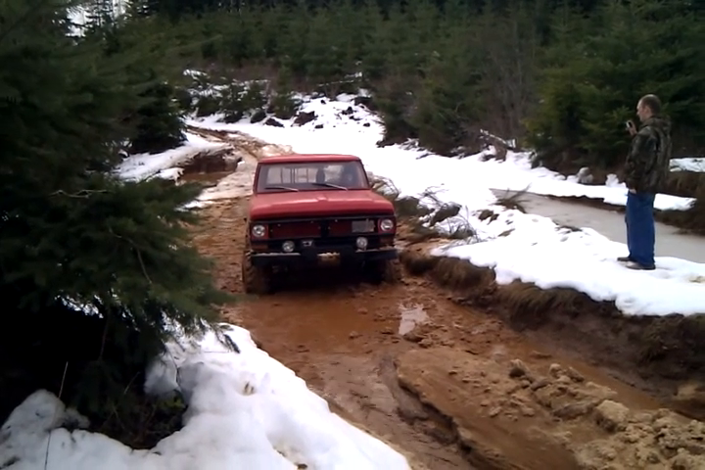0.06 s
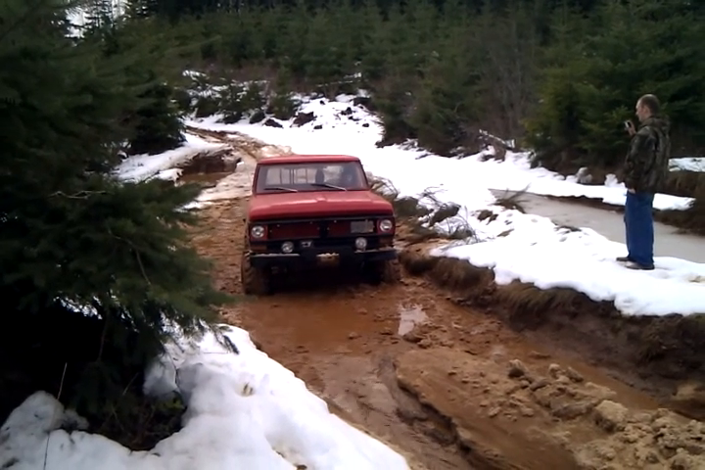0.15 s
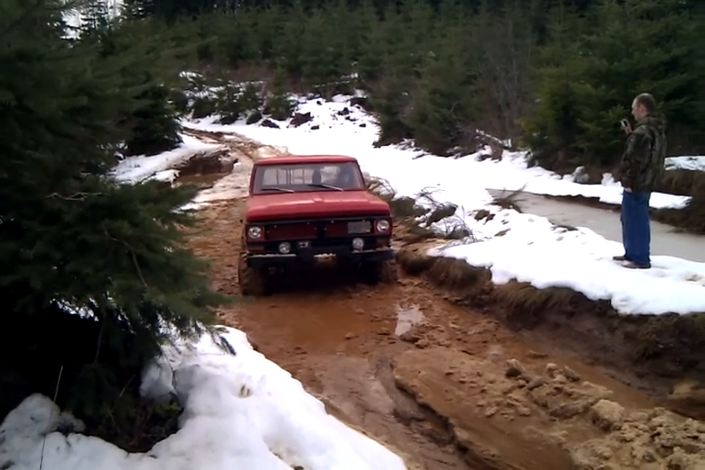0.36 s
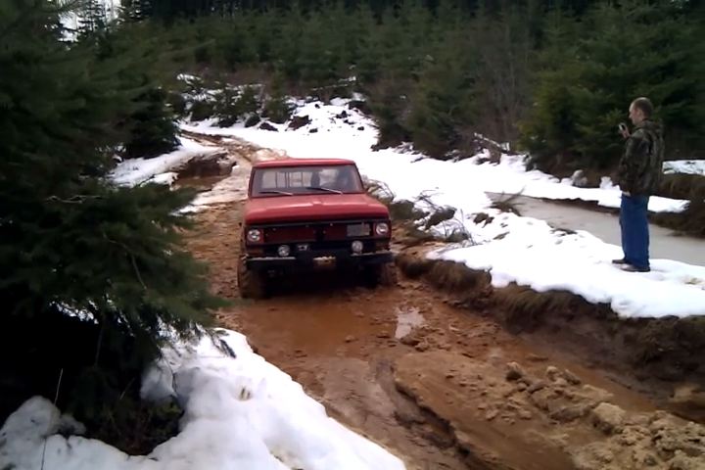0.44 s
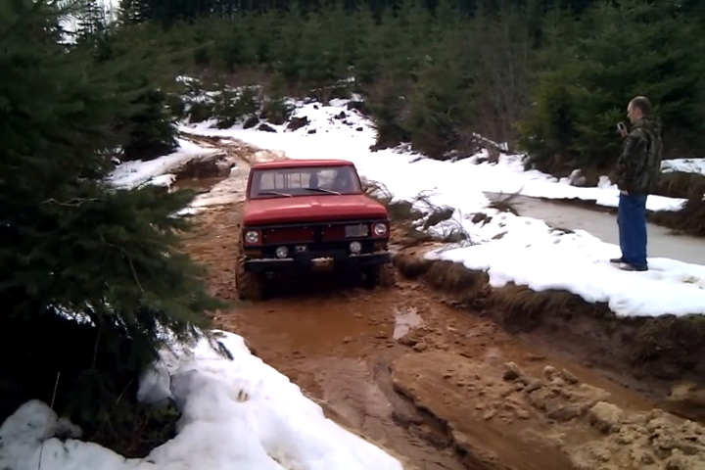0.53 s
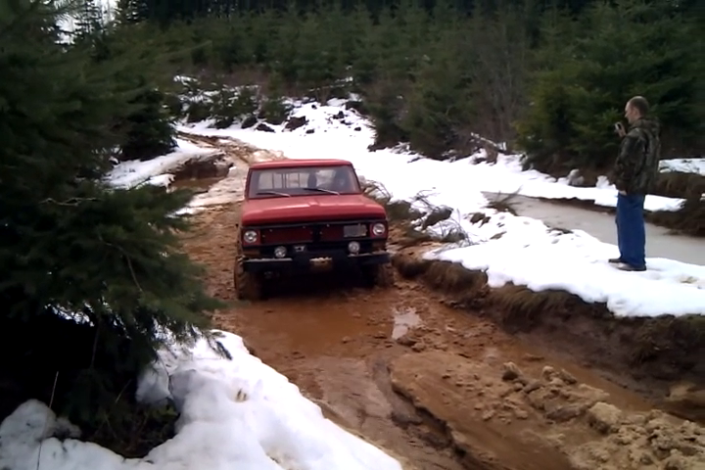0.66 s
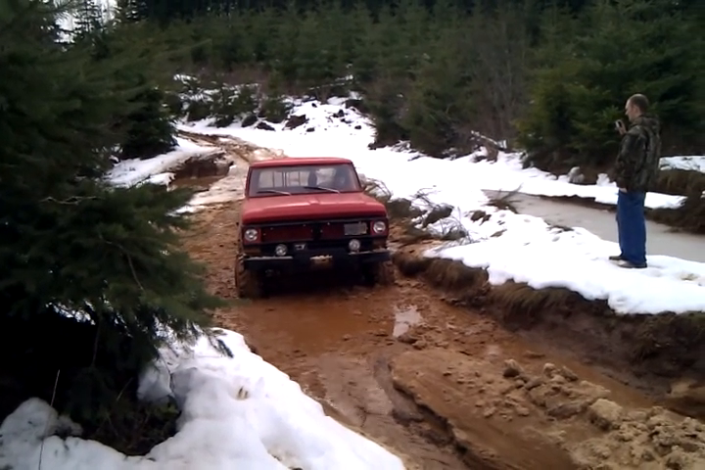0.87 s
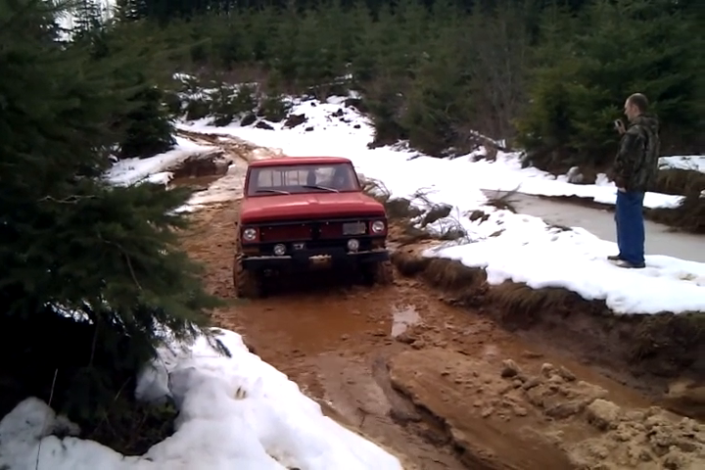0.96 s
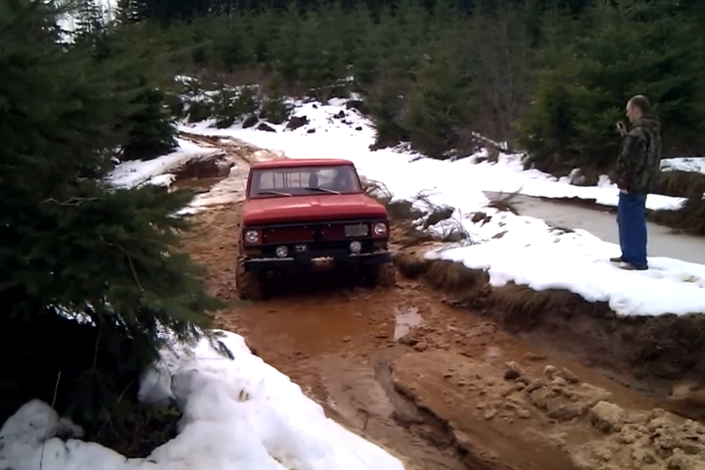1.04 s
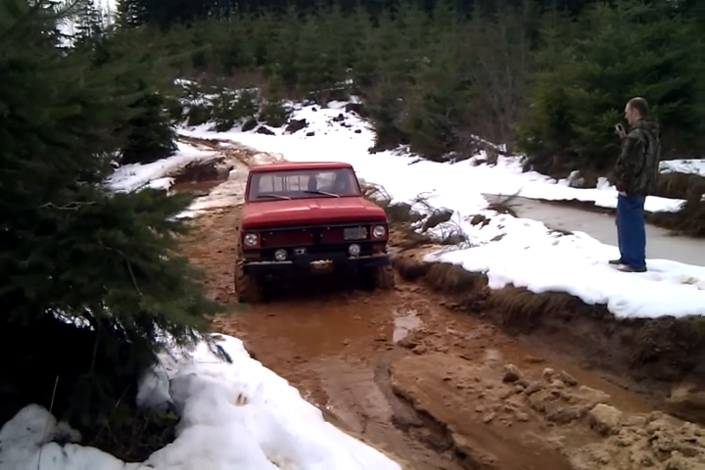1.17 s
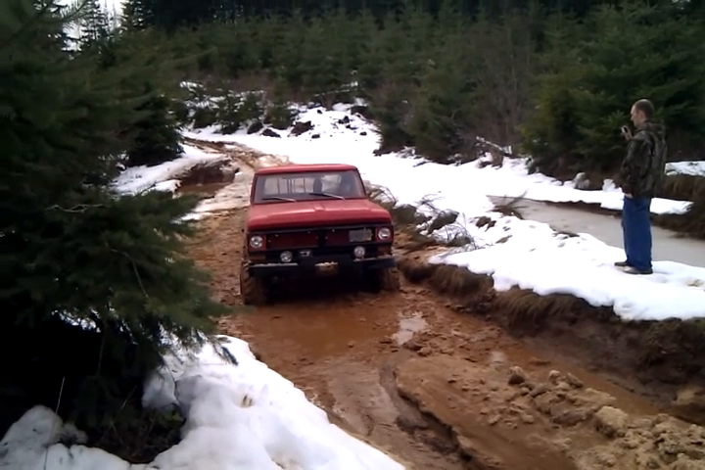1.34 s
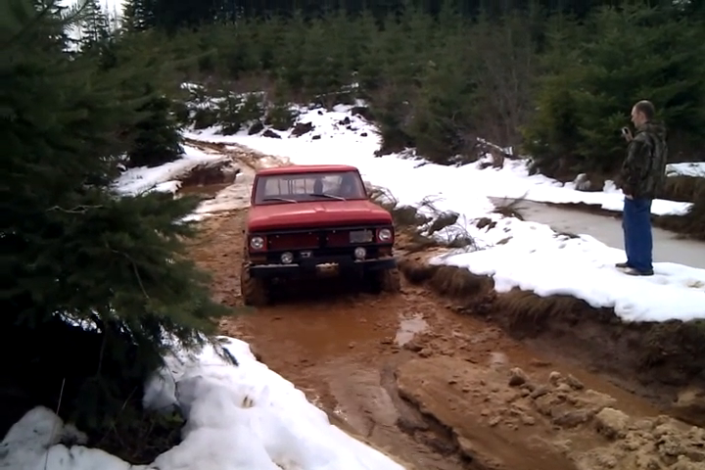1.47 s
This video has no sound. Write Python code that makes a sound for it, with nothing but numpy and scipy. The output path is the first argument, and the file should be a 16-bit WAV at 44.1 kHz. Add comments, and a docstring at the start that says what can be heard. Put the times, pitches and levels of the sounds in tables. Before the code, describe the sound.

A truck engine rumbles and revs up, with one wheel splashing into deep mud.

```python
"""A truck engine rumbles under a thin whine, then picks up and booms, working through deep mud.
Its firing note rings in the exhaust pipe and pulses through a gritty roar, sagging twice under load.
Mud slaps once, then a wheel plunges in: a thud, tyre spatter and the squelch of ringing air pockets.
A loose panel buzzes after the rev. It is all heard outdoors through a narrow-band microphone."""
import sys
import numpy as np
from scipy import signal
from scipy.fft import rfft, irfft
from scipy.io import wavfile
from scipy.ndimage import uniform_filter1d

SR = 44100
rng = np.random.default_rng(int(sys.argv[2]) if len(sys.argv) > 2 else 0)


def file_out(sig):
    """Save sig as 16-bit WAV at sys.argv[1]."""
    # one column per channel
    cols = np.atleast_2d(sig).T
    # limit, then scale
    lim = np.clip(cols, -1, 1)
    pcm = np.round(lim * 32767).astype(np.int16)
    wavfile.write(sys.argv[1], SR, pcm)


N = 66150
T = np.arange(N) / SR
HZ = np.fft.rfftfreq(N, 1 / SR)
CYLINDERS = 8

# Fader rides for the engine's low roar and treble rasp: time_s, roar_db, rasp_db
ENGINE_LEVELS = [(0, -52, -52), (.06, -47, -53), (.16, -56, -51), (.24, -49, -51), (.32, -41, -50),
                 (.4, -37, -45), (.5, -30, -37), (.6, -28, -33), (.72, -28, -33), (.78, -36, -37),
                 (.85, -38, -37), (.92, -33.5, -37), (1.0, -40, -40), (1.06, -38, -36), (1.1, -41, -40.5),
                 (1.25, -44, -38.5), (1.34, -42, -37.5), (1.39, -42, -41), (1.5, -47, -40)]


def exhaust(cycle_hz, cycles):
    """The boom: the firing note and its weaker neighbours slide through the pipe's resonance."""
    # Swell of the boom: time_s, level_db
    boom_levels = [(0, -53), (.05, -37), (.12, -46), (.2, -57), (.25, -38), (.32, -25.5), (.41, -22),
                   (.44, -27.5), (.53, -31), (.64, -27.5), (.68, -34), (.72, -28), (.78, -34), (.802, -26),
                   (.825, -29), (.85, -21.5), (.95, -26), (1.005, -33.5), (1.03, -29.5), (1.13, -31.5),
                   (1.16, -44), (1.195, -36.5), (1.26, -43), (1.31, -33.5), (1.36, -32.5), (1.44, -40),
                   (1.5, -40)]
    # Uneven firing, from pure note (0) to noise (1): time_s, roughness
    unevenness = [(0, .55), (.3, .5), (.5, .65), (.76, .7), (.85, .12), (1.1, .15), (1.18, .5), (1.33, .15),
                  (1.5, .3)]
    pipe_hz, half_width_hz, neighbour_db = 229, 22, -11
    orders = np.arange(CYLINDERS // 2, 2 * CYLINDERS)[:, None]
    pipe = 1 / (1 + 1j * (orders * cycle_hz - pipe_hz) / half_width_hz) ** 2
    weights = pipe * amp(neighbour_db * (orders != CYLINDERS))
    partials = np.exp(2j * np.pi * (orders * cycles + rng.random(orders.shape)))
    note = (weights * partials).real.sum(0)
    note /= np.sqrt((abs(weights) ** 2).sum(0) / 2)  # hold the level as the pitch moves
    rough = np.clip(curve(unevenness), 0, 1)
    flutter = ringing(pipe_hz, width_hz=85)
    return amp(curve(boom_levels)) * (np.sqrt(1 - rough ** 2) * note + rough * flutter)


def roar_and_rasp(cycles):
    """Engine noise throbs with the firing and rings in the truck's panels."""
    # EQ of the low roar: frequency_hz, gain_db
    roar_eq = [(20, -32), (55, -9), (110, -5), (175, -9), (295, 4), (400, -2), (600, -2), (800, -4),
               (930, -11), (1600, -15), (3000, -32)]
    # EQ of the treble rasp: frequency_hz, gain_db
    rasp_eq = [(200, -20), (900, -8), (1500, -8.5), (1900, -1.5), (2350, -1), (2750, -5.5), (3100, -4.5),
               (3500, -10.5), (4500, -11)]
    # Body and engine bay resonances: pitch_hz, width_hz, lift_db
    panels = [(519, 16, 5), (605, 14, 8), (738, 16, 5), (793, 20, 5), (2200, 70, 3), (2342, 45, 5),
              (2437, 55, 6), (2990, 80, 4)]
    throb_depth = .3
    throb = np.exp(throb_depth * (np.cos(2 * np.pi * CYLINDERS * cycles) + .6 * np.cos(4 * np.pi * cycles)))
    lift_db = sum(db / (1 + ((HZ - hz) / (width / 2)) ** 2) for hz, width, db in panels)
    roar = amp(curve(ENGINE_LEVELS, column=1)) * colour(patchy_noise() * throb, roar_eq, lift_db)
    rasp = amp(curve(ENGINE_LEVELS, column=2)) * colour(patchy_noise() * throb, rasp_eq, lift_db)
    return roar + rasp


def tyre_spray():
    """The tyres fling mud in a grainy spatter that peaks at the plunge."""
    # Swell of thrown mud: time_s, level_db
    spray_levels = [(0, -50), (.3, -48), (.37, -38.5), (.42, -35), (.455, -26), (.5, -25), (.53, -29),
                    (.547, -31), (.565, -23), (.585, -14.5), (.61, -15.5), (.625, -18.5), (.64, -17.5),
                    (.67, -21), (.69, -19.5), (.72, -27), (.77, -36), (.83, -42), (.9, -51), (1.5, -52)]
    # EQ of the spatter: frequency_hz, gain_db
    spray_eq = [(25, -28), (70, -10), (170, -10), (300, -3.5), (700, -3.5), (900, -4), (1200, 2.5),
                (1550, -5), (1900, 0), (2300, 1), (2800, -2), (3300, 0), (4500, -7)]
    grain_db = 2.0
    spatter = patchy_noise() * amp(grain_db * drift(500))
    return amp(curve(spray_levels)) * colour(spatter, spray_eq)


def mud_slaps():
    """Mud lands in flat, fast-dying smacks of noise."""
    # Mud hits: start_s, level_db, decay_s
    hits = [(.187, -31.5, .002), (.2443, -15.5, .003), (.251, -27, .02), (.581, -15, .006)]
    # EQ of a slap: frequency_hz, gain_db
    slap_eq = [(30, -15), (200, -11), (420, -16), (680, -2.5), (900, -3), (1230, 2), (1600, -5),
               (2600, -10), (3150, 2), (3500, -15), (4500, -19)]
    out = np.zeros(N)
    for start_s, level_db, decay_s in hits:
        smack = colour(rng.standard_normal(N), slap_eq)
        out += burst(smack, strike(start_s, rise_s=.0025, decay_s=decay_s), level_db)
    return out


def squelches():
    """Air pockets ring in the mud, each a short, wet swell."""
    # Air pockets: start_s, length_s, pitch_hz, width_hz, level_db
    pockets = [(.014, .028, 1700, 400, -42), (.194, .016, 1300, 600, -43), (.272, .016, 1650, 1100, -33),
               (.545, .06, 530, 380, -21), (.576, .036, 3100, 300, -21), (.592, .038, 606, 70, -21),
               (.623, .028, 3390, 300, -23.5), (.628, .054, 2290, 220, -20), (.643, .042, 1200, 200, -24.5),
               (.652, .028, 1800, 110, -21), (.675, .04, 2280, 650, -20.5), (1.183, .026, 2420, 280, -38),
               (1.248, .026, 2250, 750, -39), (1.30, .065, 2280, 300, -39)]
    out = np.zeros(N)
    for start_s, length_s, pitch_hz, width_hz, level_db in pockets:
        swell = np.sin(np.pi * np.clip((T - start_s) / length_s, 0, 1))
        out += burst(ringing(pitch_hz, width_hz), swell, level_db)
    return out


def wheel_thud():
    """A short, low boom as the wheel drops into the rut."""
    start_s, pitch_hz, level_db = .557, 222, -12.5
    return amp(level_db) * strike(start_s, rise_s=.015, decay_s=.017) * sine(pitch_hz * (T - start_s))


def rasp_whistle():
    """A fuzzy whistle wanders inside the engine's rasp and follows its level."""
    pitch_hz, wander, below_rasp_db = 2340, .055, 6.5
    bend = np.exp(2j * np.pi * np.cumsum(pitch_hz * wander * drift(12)) / SR)
    whistle = (signal.hilbert(ringing(pitch_hz, width_hz=220)) * bend).real
    return amp(curve(ENGINE_LEVELS, column=2) - below_rasp_db) * whistle


def panel_buzz():
    """A loose panel sings on after the rev, one wavering tone."""
    pitch_hz, level_db = 795, -40.5
    cycles = np.cumsum(pitch_hz * (1 + .014 * drift(30))) / SR
    envelope = strike(start_s=.87, rise_s=.05, decay_s=.14)
    return amp(level_db + 2.5 * drift(40)) * envelope * sine(cycles)


def belt_whine():
    """A belt-driven accessory whines and its belt whirrs, both fading as the engine picks up."""
    # Partials of the whine: harmonic, level_db
    partials = [(1, -57), (2, -52.5), (4, -56), (5, -63)]
    pitch_hz, whirr_db, hold_s, fade_s = 460.5, -50, .26, .08
    cycles = np.cumsum(pitch_hz * (1 + .002 * drift(40))) / SR
    tone = sum(amp(db + 2 * drift(20)) * sine(harmonic * cycles) for harmonic, db in partials)
    whirr = amp(whirr_db) * ringing(1450, width_hz=1400)
    return (tone + whirr) * np.clip(1 - (T - hold_s) / fade_s, 0, 1)


def mic_tick():
    """One bright tick at the height of the splash: a spike with its top rolled off."""
    time_s, decay_s, cutoff_hz = .583, .00005, 11000
    spike = amp(-13) * np.exp(-abs(np.arange(N) - round(time_s * SR)) / SR / decay_s)
    return irfft(rfft(spike) / (1 + (HZ / cutoff_hz) ** 8), N)


def amp(db):
    """Decibels to gain."""
    return 10 ** (np.asarray(db) / 20)


def unit(x):
    """Scales to rms 1."""
    return x / np.sqrt(np.mean(x ** 2) + 1e-20)


def sine(cycles):
    """A pure tone at rms 1."""
    return np.sqrt(2) * np.sin(2 * np.pi * cycles)


def curve(rows, column=1):
    """One table column as an automation lane."""
    rows = np.array(rows)
    return np.interp(T, rows[:, 0], rows[:, column])


def colour(x, eq, lift_db=0):
    """Shapes x with an EQ curve, at rms 1."""
    hz, db = np.transpose(eq)
    gain_db = np.interp(np.log(HZ + 1), np.log(hz), db) + lift_db
    return unit(irfft(rfft(x) * amp(gain_db), N))


def drift(rate_hz):
    """Random motion up to a rate, rms 1."""
    return unit(irfft(rfft(rng.standard_normal(N)) / (1 + (HZ / rate_hz) ** 4), N))


def ringing(pitch_hz, width_hz):
    """Noise in one steep-sided resonance, rms 1."""
    detune = (HZ - pitch_hz) / (width_hz / 2)
    return unit(irfft(rfft(rng.standard_normal(N)) / (1 + detune ** 2) ** 2, N))


def patchy_noise(depth_db=2.0):
    """Noise whose level flickers in small patches of time and frequency."""
    spectra = signal.stft(rng.standard_normal(N), nperseg=512, noverlap=384)[2]
    patches = uniform_filter1d(rng.standard_normal(spectra.shape), size=4, axis=0)
    patches = unit(uniform_filter1d(patches, size=7, axis=1))
    return signal.istft(spectra * amp(depth_db * patches), nperseg=512, noverlap=384)[1][:N]


def strike(start_s, rise_s, decay_s):
    """Linear attack, exponential tail."""
    attack = np.clip((T - start_s) / rise_s, 0, 1)
    return attack * np.exp(-np.maximum(T - start_s - rise_s, 0) / decay_s)


def burst(noise, envelope, level_db):
    """Enveloped noise whose crest has the given rms level."""
    shaped = noise * envelope
    return amp(level_db) * shaped * np.sqrt(np.sum(envelope ** 2) / (np.sum(shaped ** 2) + 1e-20))


def scene():
    """The labouring truck and the mud, mixed in mono."""
    # Engine speed in four-stroke cycles: time_s, cycle_hz
    engine_speed = [(0, 28.5), (.06, 30.0), (.2, 28.0), (.26, 28.2), (.32, 29.6), (.4, 28.3), (.49, 30.2),
                    (.56, 27.6), (.65, 29.2), (.74, 30.0), (.80, 29.2), (.86, 30.3), (.93, 29.6),
                    (1.0, 28.2), (1.13, 26.9), (1.19, 31.0), (1.27, 29.9), (1.36, 29.0), (1.5, 26.0)]
    cycle_hz = curve(engine_speed) * (1 + .006 * drift(25))  # a slight wobble
    cycles = np.cumsum(cycle_hz) / SR
    engine = exhaust(cycle_hz, cycles) + roar_and_rasp(cycles)
    truck = engine + belt_whine() + panel_buzz() + rasp_whistle()
    mud = tyre_spray() + mud_slaps() + squelches() + wheel_thud()
    return (truck + mud)[None]


def record(dry):
    """The microphone dulls the treble like a telephone and adds its one tick."""
    edge_hz, slope_db_per_hz, cutoff_hz = 3360, .029, 4650
    band = amp(-slope_db_per_hz * np.maximum(HZ - edge_hz, 0)) / (1 + (HZ / cutoff_hz) ** 60)
    dulled = irfft(rfft(dry) * band, N)
    fades = np.minimum(np.minimum(T, T[::-1]) / .002, 1)  # 2 ms at each end
    high_cut = signal.firwin(511, 15800, window=("kaiser", 9), fs=SR)
    return signal.oaconvolve((dulled + mic_tick()) * fades, high_cut[None], "same")


dry = scene()
out = record(dry)
file_out(out)
```